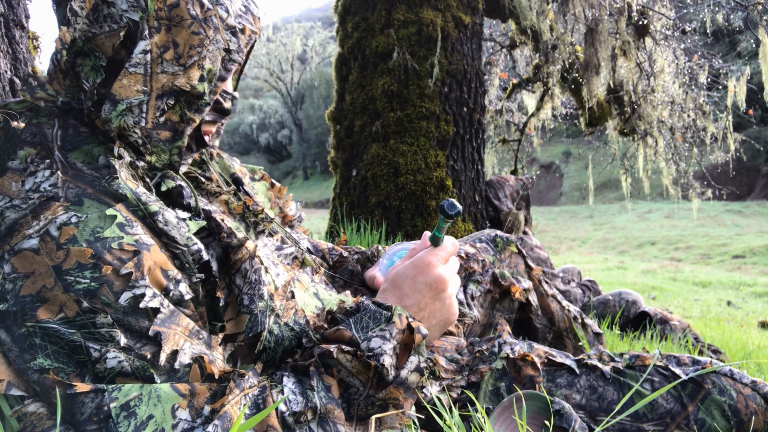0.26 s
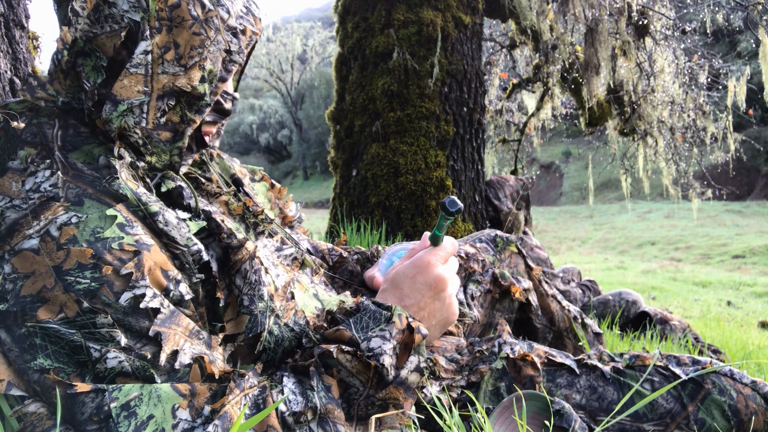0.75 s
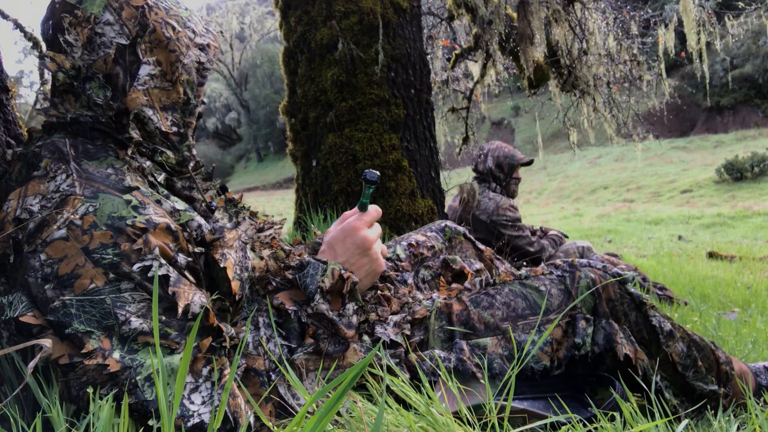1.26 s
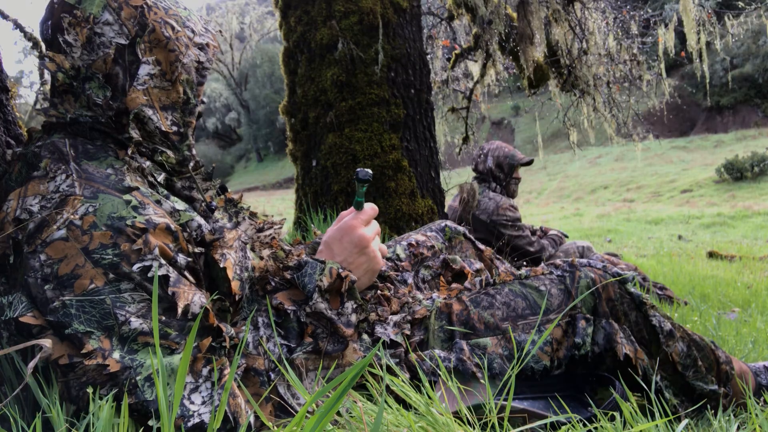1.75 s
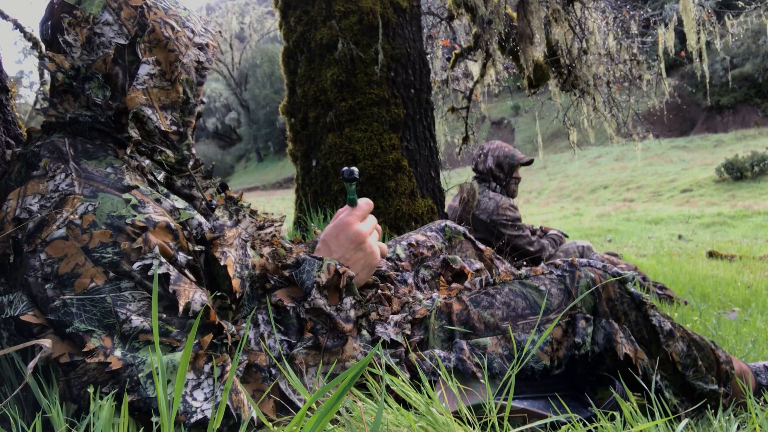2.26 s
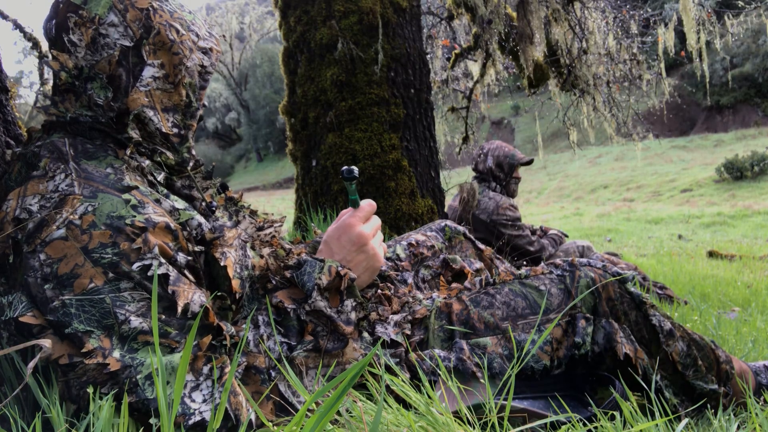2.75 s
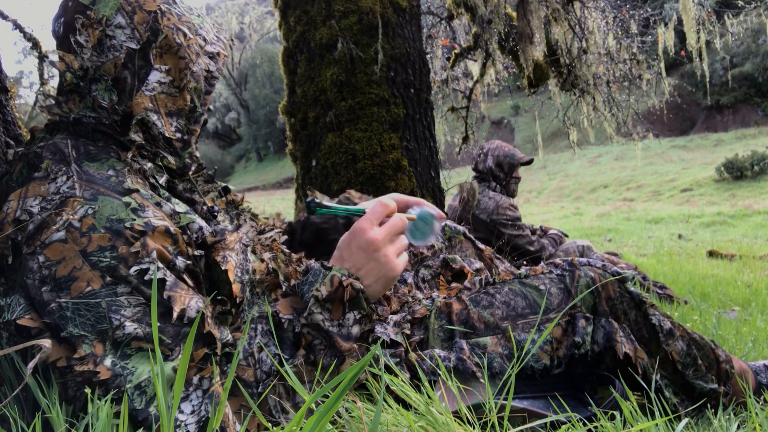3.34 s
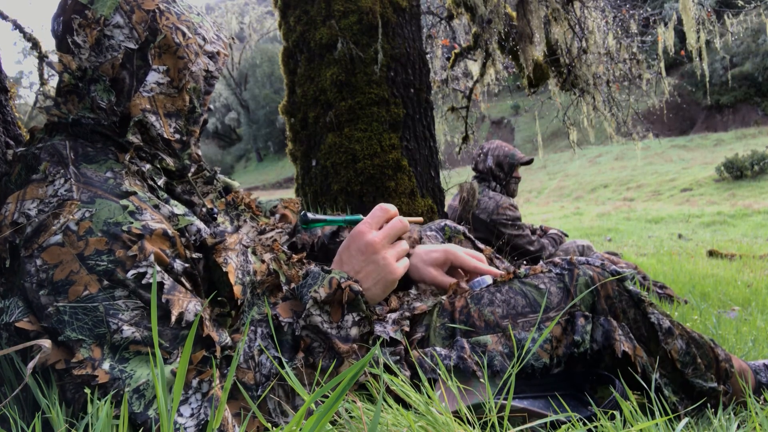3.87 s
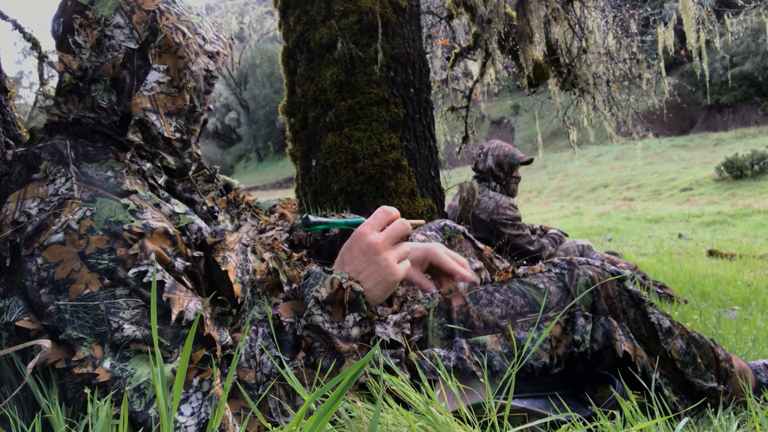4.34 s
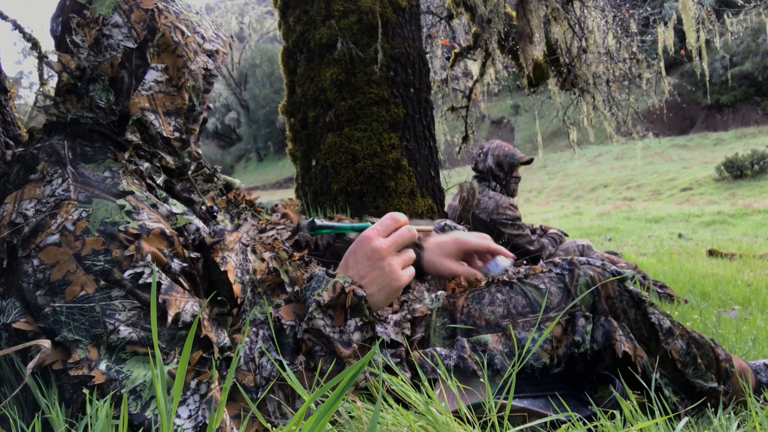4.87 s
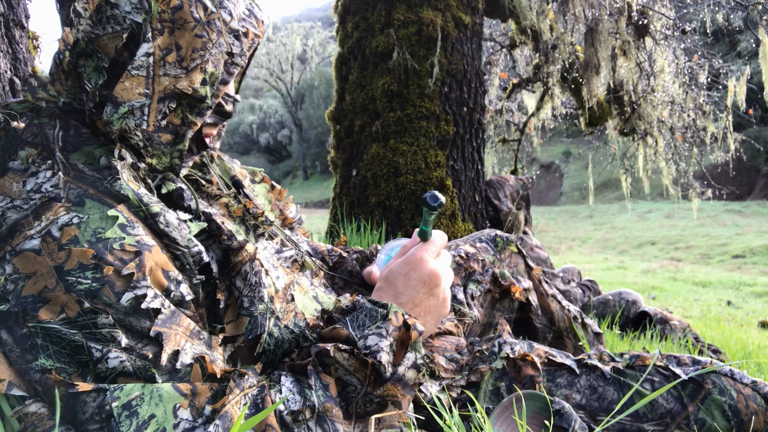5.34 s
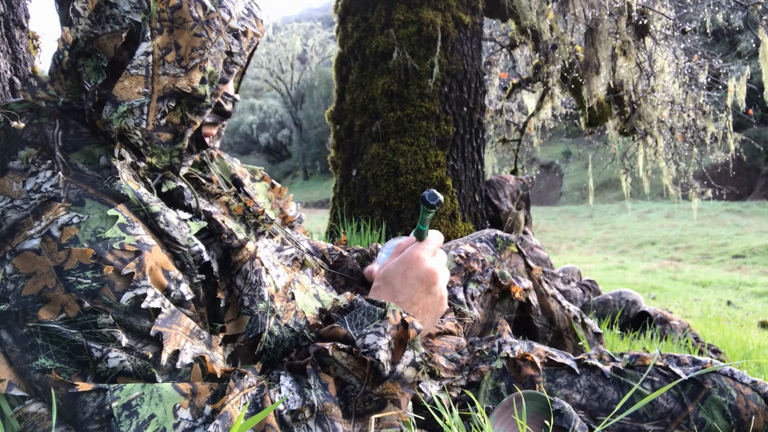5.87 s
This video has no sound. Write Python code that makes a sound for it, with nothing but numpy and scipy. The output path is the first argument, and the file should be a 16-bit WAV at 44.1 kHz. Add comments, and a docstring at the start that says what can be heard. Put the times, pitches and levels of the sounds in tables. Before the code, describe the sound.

Short raspy yelps scratched from a pot-shaped call, long soft scraping, repeated bird chirps, light cloth rustle, then a loud yelp and brief whistle.

```python
"""A short faint yelp opens over murmuring air: a striker is drawn over the plate of a pot-shaped turkey call
in a clearing. Light strokes only scrape, as noise through the pot's modes; firm ones catch into stick-slip
and yelp, as pulse-like tones through the plate's modes, and once the plate whistles as a near-sine.
One bird repeats arched gliding chirps, a farther one trills as a buzzing sweep with stray notes around it,
and clothing rustles and ticks in filtered noise."""
import sys
import numpy as np
from scipy import signal
from scipy.fft import rfft, irfft, next_fast_len
from scipy.io import wavfile
from scipy.ndimage import map_coordinates

SR = 44100
rng = np.random.default_rng(int(sys.argv[2]) if len(sys.argv) > 2 else 0)


def store_wav(level_fs):
    """Save 16-bit WAV to argv[1]."""
    pcm = np.round(np.clip(np.atleast_2d(level_fs), -1, 1) * 32767)
    wavfile.write(sys.argv[1], SR, pcm.T.astype(np.int16))


N = 269451  # length in samples


def amp(db):
    """Linear gain of a level in dB."""
    return 10 ** (np.asarray(db) / 20)


def unit(x):
    """x scaled to an RMS of 1."""
    return x / np.sqrt(np.mean(x ** 2) + 1e-20)


def curves(rows):
    """First sample of a table's span, and one value per sample of the span for each column."""
    s, *cols = np.transpose(rows)
    first = round(s[0] * SR)
    t = np.arange(first, min(N, round(s[-1] * SR))) / SR
    return first, [np.interp(t, s, c) for c in cols]


def add(track, first, x):
    """Mixes x into track from sample first."""
    track[first:first + len(x)] += x[:len(track) - first]


def sine(hz):
    """A sine that follows a pitch curve in Hz."""
    return np.sin(2 * np.pi * np.cumsum(hz) / SR)


def ringing(x, spectrum):
    """x through a causal minimum-phase filter of energy 1, shaped by (Hz, relative dB) points."""
    size = 2 ** 13
    f, db = np.transpose(spectrum)
    log_hz = np.log(np.fft.rfftfreq(size, 1 / SR) + 1)
    gain = amp(np.interp(log_hz, np.log(f), db))
    # folding the cepstrum onto positive time makes the filter causal
    cepstrum = irfft(np.log(gain + 1e-4))
    cepstrum[1:size // 2] *= 2
    cepstrum[size // 2 + 1:] = 0
    pulse = irfft(np.exp(rfft(cepstrum)))[:size // 2]
    return signal.fftconvolve(x, pulse / np.linalg.norm(pulse))[:len(x)]


def wobble(count, rate):
    """A smooth random curve, rate knots a second."""
    knots = rng.standard_normal(int(count * rate / SR) + 4)
    return map_coordinates(knots, [np.arange(count) * rate / SR])


def echoes(x, t60):
    """Trunks and ground scatter a noise-like tail of energy 1, falling 60 dB in t60 seconds."""
    t = np.arange(SR // 2) / SR
    tail = rng.standard_normal(len(t)) * amp(-60 * t / t60)
    return signal.fftconvolve(x, tail / np.linalg.norm(tail))[:N]


# Colour of the air. Each row: frequency in Hz, relative level in dB per Hz.
AIR_SPECTRUM = [(26, -32), (45, -0.5), (311, -6.5), (496, -11.5), (698, -10.5), (809, -11), (1090, -10.5),
                (1200, -13), (1390, -6.5), (1650, -16), (2000, -14.5), (3600, -16), (4600, -17.5),
                (5070, -19), (15600, -32.5)]
AIR_DB = -67


def air():
    """Distant leaves and wind: noise with a fixed colour, drifting a little in level."""
    drift = amp(AIR_DB + 0.2 * wobble(N, 0.76))
    return drift * ringing(rng.standard_normal(N), AIR_SPECTRUM)


# The trill's contour. Each row: time in seconds, level in dB before the mix, base pitch in Hz.
TRILL_CONTOUR = [(.38, -75, 4500), (.5, -75, 4580), (.85, -76.5, 4380), (1.1, -74.5, 4410),
                 (1.3, -60, 4370), (1.6, -54, 4685), (2.15, -57, 4744), (2.3, -60.5, 4635),
                 (2.55, -72, 4640)]
# The trill opens from a thin whistle to a wide buzz. Each row: time in seconds, sweep width in Hz.
TRILL_WIDTH = [(1.12, 340), (1.42, 1148), (2.35, 1348)]
# Stray bird notes. Each row: start in seconds, level in dB before the mix, first pitch in Hz,
# last pitch in Hz, length in seconds.
STRAY_NOTES = [(0.122, -70.5, 3300, 3320, 0.046), (0.184, -58.5, 8170, 7300, 0.0091),
               (2.69, -51, 5900, 4810, 0.045), (3.45, -71, 3200, 3140, .06),
               (4.113, -50.5, 5810, 4940, 0.041), (5.535, -65, 3215, 3160, 0.025)]
SYLLABLES_PER_S, FLUTTER_HZ = 18.8, 237
TRILL_ECHO_S, NOTE_ECHO_S = 0.22, 0.32  # T60


def far_birds():
    """A buzzy trill of falling syllables, and single gliding notes, blurred by distance."""
    first, (db, base_hz) = curves(TRILL_CONTOUR)
    count = len(db)
    t = np.arange(count) / SR
    width_hz = np.interp(t + first / SR, *np.transpose(TRILL_WIDTH))
    beat = (SYLLABLES_PER_S * t + .8) % 1  # position within the syllable, 0 to 1
    buzz = sine(FLUTTER_HZ + 12 * wobble(count, 30))  # fast flutter inside each syllable
    # the flutter narrows, so each syllable ends on a clearer tone
    place = .75 * (1 - beat) ** 1.7 + 0.24 + 0.37 * (1.15 - beat) * buzz
    swell = 0.54 + 0.37 * np.sin(np.pi * beat ** 1.2)
    level = amp(db + 5 + buzz) * swell * amp(2.4 * wobble(count, 12.29))
    trill = np.zeros(N)
    add(trill, first, level * sine(base_hz + place * width_hz))
    # a steadier strand runs through the buzz
    core_hz = base_hz + width_hz / 3 + 40 * wobble(count, 30)
    core_level = amp(db - 0.2 + 2.2 * wobble(count, 25)) * beat
    add(trill, first, core_level * sine(core_hz))

    notes = np.zeros(N)
    for start, db, from_hz, to_hz, length in STRAY_NOTES:
        u = np.arange(round(length * SR)) / (length * SR)
        glide_hz = to_hz + (from_hz - to_hz) * (1 - u) ** 4
        add(notes, round(start * SR), amp(db) * np.sin(np.pi * u ** .7) * sine(glide_hz))
    far_trill = amp(-12.5) * trill + amp(-5.5) * echoes(trill, TRILL_ECHO_S)
    return far_trill + amp(-5.5) * notes + amp(-4.0) * echoes(notes, NOTE_ECHO_S)


# Chirp starts, in seconds.
CHIRP_STARTS = [1.9195, 2.0401, 2.169, 2.2917, 2.4094, 2.5346, 2.653, 2.7744, 2.8923, 3.0115, 3.1299,
                3.2485, 3.368, 3.488, 3.605, 3.7253, 3.8443, 3.9652, 4.083, 4.2036, 4.3256, 4.4405, 4.562,
                4.6823, 4.804]
# The arch of one chirp. Each row: time from its start in seconds, share of top pitch (ratio), level in dB.
CHIRP_ARCH = [(-.015, .68, -12), (-.008, .7, -7), (-.003, .75, -7), (.003, .94, -2), (.011, 1.01, -1.5),
              (.019, 1.0, 1.5), (.025, .84, -1), (.033, .9, -10), (.046, .87, -20)]
CHIRP_DB, CHIRP_SHY_DB, CHIRP_SWELL_S = -51.5, -12, 1  # the series starts soft and swells
CHIRP_HZ, CHIRP_FLAT_HZ, CHIRP_CLIMB_S = 2638, -390, .7  # and starts flat and climbs


def chirper():
    """One arched whistle, repeated at an even pace, each with its own randomly drawn echo tail."""
    out = np.zeros(N)
    for start in CHIRP_STARTS:
        since = start - CHIRP_STARTS[0]
        db = CHIRP_DB + CHIRP_SHY_DB * np.exp(-since / CHIRP_SWELL_S) + rng.normal(0, 0.83)
        top_hz = CHIRP_HZ + CHIRP_FLAT_HZ * np.exp(-since / CHIRP_CLIMB_S)
        top_hz *= rng.normal(1, .008)
        first, (share, shape_db) = curves(np.array(CHIRP_ARCH) + [start, 0, 0])
        phase = 2 * np.pi * np.cumsum(share * top_hz) / SR
        level = amp(db + shape_db + 1.7 * wobble(len(phase), 167))
        overtone = amp(-42.0) * share ** 4 * np.sin(2 * phase)
        chirp = level * (np.sin(phase) + overtone)
        add(out, first, chirp)
        add(out, first, amp(-6.5) * echoes(chirp, 0.36))
    return out


# Rubbing fabric. Each row: time in seconds, level in dB before a 7 dB lift.
RUSTLE_LEVEL = [(3.0, -83), (3.05, -77.5), (3.5, -81), (3.83, -76), (3.91, -70), (3.99, -76.5), (4.05, -70),
                (4.18, -71), (4.266, -74), (4.33, -70.5), (4.45, -71.5), (4.62, -68.5), (4.81, -69.5),
                (4.91, -80), (4.95, -87.5)]
# Colour of the rub. Each row: frequency in Hz, relative level in dB per Hz.
CLOTH_SPECTRUM = [(500, -34.5), (1000, -1.5), (2000, -1.5), (4200, -2.5), (5600, -4), (6800, -4),
                  (8200, -13.5), (9500, -9.5), (10500, -15.5), (12000, -8), (14000, -12.5), (15700, -10.5)]
# Dry ticks. Each row: start in seconds, level in dB before a 2 dB cut and the filter.
CLOTH_TICKS = [(0.6904, -48), (0.9343, -50.5), (0.9443, -52), (2.4714, -51.5), (2.7964, -53.5),
               (3.245, -48), (3.5344, -44.5), (4.1727, -46), (5.2711, -51.5), (5.2748, -45),
               (5.2798, -43.5), (5.283, -44), (5.288, -47), (5.2914, -49), (5.5228, -53.5)]
# Colour of a tick. Each row: frequency in Hz, relative level in dB per Hz.
TICK_SPECTRUM = [(400, -39), (1000, -1), (4000, -4), (8000, -5.5), (12000, -8), (15700, -7.5)]
TICK_T60_S = 0.0093


def clothing():
    """Fabric rubs in a grainy hiss of noise and gives off single dry ticks, short decaying noise bursts."""
    rub, ticks = np.zeros(N), np.zeros(N)
    first, (db,) = curves(RUSTLE_LEVEL)
    grain = amp(db + 7 + .8 * wobble(len(db), 420))
    add(rub, first, grain * rng.standard_normal(len(db)))
    t = np.arange(SR // 20) / SR
    for start, db in CLOTH_TICKS:
        decay = amp(db - 2 - 60 * t / TICK_T60_S)
        add(ticks, round(start * SR), decay * rng.standard_normal(len(t)))
    return ringing(rub, CLOTH_SPECTRUM) + ringing(ticks, TICK_SPECTRUM)


# Scraping strokes. Each row: start, turn and end in seconds, plate drive in dB at each of these three,
# striker hiss over it in dB before its pitch tilt, hiss pitch at start and at end in Hz.
SCRAPE_STROKES = [ (0.266, 0.284, 0.35, -55.5, -57.5, -67.5, -29, 3400, 3500),
                  (0.527, 0.568, 0.6, -66.5, -50, -55.5, -27, 3511, 3540),
                  (0.73, 0.796, .9, -65.5, -58.5, -75.5, -30, 3600, 3520),
                  (0.993, 1.037, 1.032, -70, -46, -37, -32, 3230, 3270),
                  (1.182, 1.376, 1.44, -73.5, -56, -69, -14.5, 3520, 3570),
                  (1.466, 1.494, 1.667, -60, -53, -69, -21, 3600, 3400),
                  (1.702, 1.733, 1.893, -54, -46, -62.5, -18, 3330, 3780),
                  (1.902, 1.954, 1.9705, -51, -50, -54, -15, 3800, 3320),
                  (1.977, 2.02, 2.17, -64, -60.5, -66, -25, 3320, 3500),
                  (2.111, 2.203, 2.252, -58.5, -45.5, -52, -17, 3380, 4100),
                  (2.309, 2.335, 2.45, -58.5, -54, -57, -14, 3820, 3250),
                  (2.526, 2.6, 2.625, -46.5, -43, -51.5, -15.5, 3600, 3980),
                  (2.696, 2.746, 2.805, -53.5, -53, -67.5, -7.5, 3416, 3440),
                  (2.863, 2.928, 2.94, -50, -42, -55.5, -20, 3800, 3900),
                  (4.962, 5.087, 5.1, -60, -45.5, -40.5, -20.5, 3446, 3340),
                  (5.174, 5.197, 5.235, -46, -49.5, -64.5, -14, 3480, 3470),
                  (5.265, 5.284, 5.34, -70, -57, -69, -18, 3520, 3300),
                  (5.364, 5.482, 5.53, -60.5, -56, -66.5, -9, 3285, 3190),
                  (5.57, 5.687, 5.734, -68, -41.5, -44.5, -26, 3500, 3670),
                  (5.746, 5.766, 5.82, -41.5, -38, -58, -17, 3250, 3430),
                  (5.88, 5.89, 5.93, -52.5, -50, -54.5, -10, 3153, 3300), ]
# A firm moment wakes the shaft. Each row: time in seconds, hum level in dB before its flicker.
SHAFT_WAKES = [(1.765, -63), (2.14, -68), (2.251, -64), (2.6, -69), (2.925, -58.5)]
# The tip lands on the plate: time in seconds, impulse level in dB before the modes.
TIP_TAP = (1.1115, -25)
# Shaft, plate and pot under a light stroke. Each row: frequency in Hz, relative level in dB per Hz.
POT_MODES = [(260, -72.5), (450, -44.5), (521, -42.5), (611, -22), (644, -30.5), (765, -27), (916, -17),
             (1090, -11.5), (1230, -3.5), (1280, -6), (1400, 5), (1590, 4), (1860, -5), (2060, -29.5),
             (2200, -28.5), (2860, -51), (4840, -120)]
# High plate modes, shared with the yelps. Each row: frequency in Hz, relative level in dB per Hz.
SHRILL_MODES = [(1260, -40.5), (2150, -7), (2440, -2), (2670, -5.5), (3020, -1.5), (3420, -19),
                (3780, -6.5), (4250, -10), (4930, -31), (6020, -19.5), (10100, -43), (11400, -33),
                (15600, -45.5)]
# Finest grain of the scrape. Each row: frequency in Hz, relative level in dB per Hz.
GRIT_SPECTRUM = [(2710, -29.5), (4600, 0.5), (5040, -7.5), (6550, 1.5), (8040, -8), (9140, -8.5),
                 (10300, -19.5), (11900, -5.5), (12900, -12.5), (15300, -9), (15600, -20.5)]
TOUCH_S, LIFT_S = .022, 0.022  # the tip comes down; it lifts off and trails away over twice this
STRIKER_HZ, STRIKER_DB = 3270, -24  # a fixed mode of the striker
HISS_DB_PER_HZ = 0.0205  # higher hiss is louder
# grit level at 0 dB drive; dB of grit per dB of drive; drive above which it grows no more
GRIT_DB, GRIT_GROWS, GRIT_FULL_DB = -42, 0.57, -45.5
SHAFT_HZ, WAKE_S = 645, 0.015
SHRILL_DB = -24.5  # a light stroke also shakes the high modes, under the low ones


def scrape():
    """Grit under the sliding tip shakes the plate in uneven lumps; the striker hisses at a gliding pitch."""
    drive, hiss, grit = np.zeros(N), np.zeros(N), np.zeros(N)
    for start, turn, end, start_db, turn_db, end_db, hiss_db, from_hz, to_hz in SCRAPE_STROKES:
        first, (db,) = curves([
            (start - TOUCH_S, start_db - 41), (start, start_db), (turn, turn_db), (end, end_db),
            (end + LIFT_S / 2, end_db - 12.5), (end + 2 * LIFT_S, end_db - 38.5)])
        t = np.arange(first, first + len(db)) / SR
        hz = np.interp(t, [start, end], [from_hz, to_hz])
        mode_level = amp(STRIKER_DB + db + .5 * (hiss_db + 14.5)) * wobble(len(db), 250)
        add(hiss, first, mode_level * np.sin(2 * np.pi * STRIKER_HZ * t))
        add(drive, first, amp(db))
        hiss_level = amp(db + hiss_db + HISS_DB_PER_HZ * (hz - 3600.5)) * wobble(len(db), 600)
        add(hiss, first, hiss_level * sine(hz))
        add(grit, first, amp(GRIT_DB + GRIT_GROWS * np.minimum(db, GRIT_FULL_DB)))

    t = np.arange(N) / SR
    wake = sum(amp(db) * np.exp(-((t - s) / WAKE_S) ** 2) for s, db in SHAFT_WAKES)
    shaft_phase = 2 * np.pi * SHAFT_HZ * t
    shaft_tone = np.sin(shaft_phase) + amp(7) * np.sin(2 * shaft_phase)
    hiss += wake * amp(3.3 * wobble(N, 60)) * shaft_tone

    lumps = unit(amp(1.8 * wobble(N, 180) + 0.9 * wobble(N, 35)))
    drive *= lumps * rng.standard_normal(N)
    tap_s, tap_db = TIP_TAP
    drive[round(tap_s * SR)] += amp(tap_db)
    body = ringing(drive, POT_MODES) + amp(SHRILL_DB) * ringing(drive, SHRILL_MODES)
    grain = ringing(grit * np.sqrt(lumps) * rng.standard_normal(N), GRIT_SPECTRUM)
    return body + lumps * hiss + grain


# One plate mode singing by itself. Each row: time in seconds, level in dB before a 3 dB lift.
WHISTLE_LEVEL = [(5.7, -66), (5.714, -42), (5.741, -28.5), (5.754, -24), (5.762, -17), (5.7735, -21),
                 (5.776, -29), (5.797, -28), (5.812, -42), (5.83, -64), (5.875, -72)]
# The shaft under the whistle. Each row: time in seconds, pitch in Hz, level in dB before a 2.5 dB cut.
WHISTLE_SHAFT = [(5.66, 715, -72), (5.7, 742, -61), (5.75, 768, -59.5), (5.79, 775, -78)]
WHISTLE_HZ, WHISTLE_HZ_PER_S, WHISTLE_TOP_HZ = 1680, 1230, 1803  # rises from the first to the last


def whistle():
    """A nearly pure tone whose overtones fade faster than it does; the shaft hums below it."""
    first, (db,) = curves(WHISTLE_LEVEL)
    count = len(db)
    hz = np.minimum(WHISTLE_HZ + WHISTLE_HZ_PER_S * np.arange(count) / SR, WHISTLE_TOP_HZ)
    phase = 2 * np.pi * np.cumsum(hz) / SR
    flicker_db = 1.34 * wobble(count, 249.6)
    quiet_flicker_db = np.clip(-27 - db, 0, 4) * wobble(count, 151)  # the soft ends waver more
    level = amp(db + 3.0 + flicker_db + quiet_flicker_db)
    side = np.sin(1.6 * phase) * (amp(3 * wobble(count, 120)) + 0.69)  # an inharmonic side tone
    overtones = amp(-27.5) * np.sin(2 * phase) + amp(-38.5) * np.sin(3 * phase) + amp(-27.5) * side
    out = np.zeros(N)
    add(out, first, level * np.sin(phase) + level ** 2 * overtones)
    first, (hz, db) = curves(WHISTLE_SHAFT)
    add(out, first, amp(db - 2.5) * sine(hz))
    return out


# Spells in which a rival plate tone sings along. Each row: start and end in seconds,
# first and last pitch in Hz before its random wobble, level in dB.
RIVAL_SPELLS = [(0.032, .038, 1760, 1720, -52), (.052, .071, 1442, 1427, -40),
                (.573, .591, 1417, 1442, -35), (.595, 0.62, 1595, 1633, -25),
                (.627, 0.651, 1432, 1388, -25), (0.662, 0.67, 1398, 1443, -23),
                (1.044, 1.055, 1648, 1615, -29), (1.058, 1.061, 1490, 1461, -24),
                (1.064, 1.077, 1745, 1718, -25.5), (5.124, 5.133, 1920, 1927, -33),
                (5.136, 5.143, 1780, 1410, -13), (5.148, 5.163, 1426, 1386, -21.5),
                (5.166, 5.172, 1382, 1408, -32.5)]
RIVAL_FADE_S = 0.0061  # 20 dB up or down


def rivals():
    """The rival plate tone at size 1, and its level; it moves from mode to mode between spells."""
    start, end, from_hz, to_hz, db = np.transpose(RIVAL_SPELLS)
    t = np.arange(N) / SR
    level = np.zeros(N)
    for a, b, top in zip(start, end, db):
        first, (spell_db,) = curves([
            (a - RIVAL_FADE_S, top - 20), (a, top), (b, top), (b + RIVAL_FADE_S, top - 20)])
        add(level, first, amp(spell_db))
    times = np.ravel([start, end], "F")
    pitch = np.interp(t, times, np.ravel([from_hz, to_hz], "F"))
    return sine(pitch * (1 + 0.027 * wobble(N, 163.3))), level


# Yelps, the tip sticking and slipping; one list per yelp.
# Each row: time in seconds, slip rate in Hz, drive level in dB before the modes.
YELP_CONTOURS = [
    [(.026, 659, -51), (.034, 630, -31), (.056, 637.5, -33.5), (.068, 674, -41), (.078, 720, -73)],
    [(.562, 655, -48.5), (.575, 633.2, -26.5), (.59, 639, -29.5), (.618, 647.6, -30.5), (.654, 626.8, -26),
     (.669, 678, -28.5), (.677, 720, -62)],
    [(1.036, 651.4, -54), (1.045, 654.4, -29.5), (1.052, 637.3, -22), (1.064, 641, -25),
     (1.0745, 646.3, -21.5)],
    [(5.093, 731, -41), (5.105, 712.4, -15), (5.118, 710.7, -14.5), (5.128, 679, -9), (5.136, 626.2, -15.5),
     (5.152, 618, -13), (5.159, 620.7, -15.5), (5.168, 651, -12.5), (5.176, 692, -11), (5.182, 716.5, -15),
     (5.19, 720, -59.5)],
]
# Each yelp while it slips slowly. Each row: roughness (0-1), treble over the body in dB.
YELP_GRIPS = [(0.08, -38), (0.57, -30), (0.43, -25), (0.2, -20)]
# Low plate modes under a yelp. Each row: frequency in Hz, relative level in dB per Hz.
PLATE_MODES = [(400, -66), (900, -45.5), (1080, -21), (1220, 0), (1330, 7.5), (1600, 4), (1850, -6),
               (2000, -19), (2150, -45), (2800, -58), (4700, -120)]
CLEAN_HZ, CLEARING_HZ = 687.4, 47.6  # slips this fast are cleanest; roughness grows over this span below
# treble fades as the slips speed up, and is weak until they have first slowed
TREBLE_DB_PER_HZ, WAKING_DB_PER_HZ = -0.0773, -0.1387
CLICK_HZ, CLICK_DB, CLICK_T60_S = 2500, -25.5, 0.0019


def yelps():
    """The slip rate glides through each yelp and wavers where it is rough; a second plate tone fights it."""
    low, high = np.zeros(N), np.zeros(N)
    rival, rival_level = rivals()
    tones = amp(1.3 * wobble(N, 200)) * rival_level * rival
    for rows, (roughness, bright_db) in zip(YELP_CONTOURS, YELP_GRIPS):
        first, (hz, db) = curves(rows)
        count = len(hz)
        span = slice(first, first + count)
        slowness = np.clip((CLEAN_HZ - hz) / CLEARING_HZ, .1, 1)
        rough = np.clip(roughness * slowness, 0, 1)
        waking_hz = np.minimum.accumulate(hz) - hz.min()  # how far the slips have yet to slow
        treble_db = bright_db + TREBLE_DB_PER_HZ * (hz - hz.min()) + WAKING_DB_PER_HZ * waking_hz
        phase = 2 * np.pi * np.cumsum(hz * (1 + 0.017 * rough * wobble(count, 200))) / SR
        chatter = rng.standard_normal(count)  # the grip chatters at random
        slips = unit(sum(np.cos(k * phase) for k in range(2, 23)))
        add(low, first, amp(db) * (amp(-3.5) * slips + np.sqrt(rough) * chatter))
        # the rival tone shifts each slip, which splits the high partials
        pushed = phase + 0.34 * np.minimum(rival_level[span] / amp(db), 1) * rival[span]
        pushed_slips = unit(sum(np.cos(k * pushed) for k in range(3, 23)))
        rasp = pushed_slips + np.sqrt(rough + .2) * chatter
        add(high, first, amp(db + treble_db) * rasp)
        add(tones, first, amp(0.63 * db - 37.5) * np.cos(phase))  # the shaft hums at the slip rate
    out = ringing(low, PLATE_MODES) + ringing(high, SHRILL_MODES) + tones
    # an edit chops the third yelp off abruptly, with a click
    after = np.arange(SR // 20) / SR
    stop = round(YELP_CONTOURS[2][-1][0] * SR)
    click = amp(CLICK_DB - 60 * after / CLICK_T60_S) * np.sin(2 * np.pi * CLICK_HZ * after)
    out[stop:stop + SR // 20] = click
    return out


def scene():
    """The call with its faint echo, the birds, the clothing and the air, as one channel."""
    call = yelps() + whistle() + scrape()
    call_echo = amp(-46) * echoes(call, 0.22)
    return (call + call_echo + chirper() + far_birds() + clothing() + air())[None]


TOP_HZ = 15810


def record(dry):
    """Cuts everything from the band limit up with a brick-wall filter."""
    m = next_fast_len(N + SR // 2)
    kept = np.fft.rfftfreq(m, 1 / SR) < TOP_HZ
    return irfft(rfft(dry, m) * kept, m)[..., :N]


dry = scene()
out = record(dry)
store_wav(out)
```